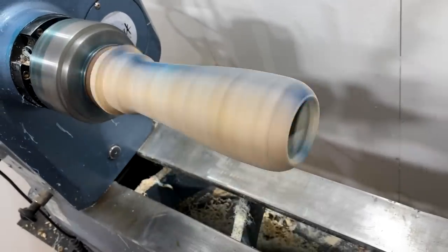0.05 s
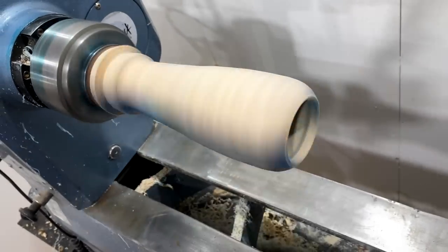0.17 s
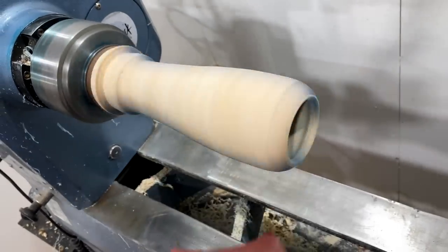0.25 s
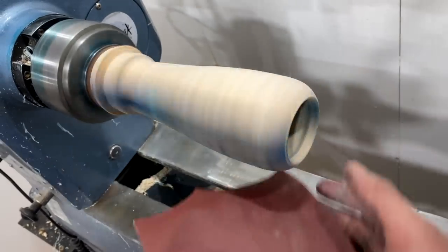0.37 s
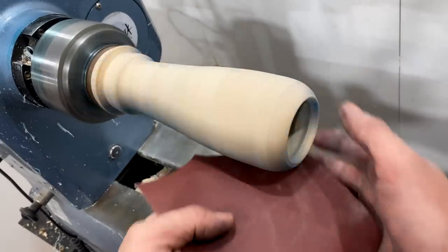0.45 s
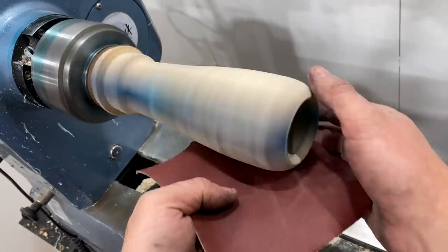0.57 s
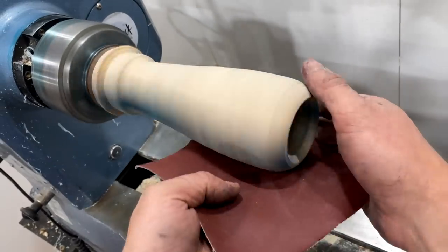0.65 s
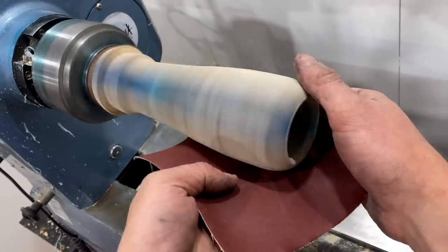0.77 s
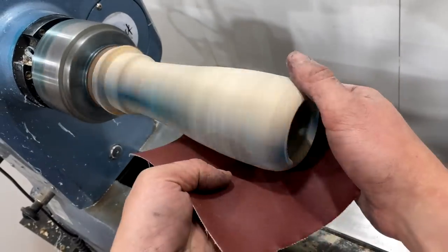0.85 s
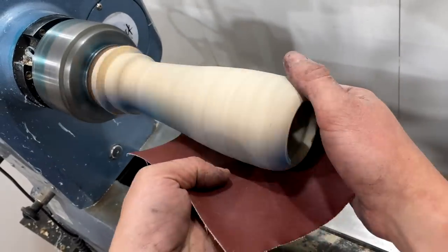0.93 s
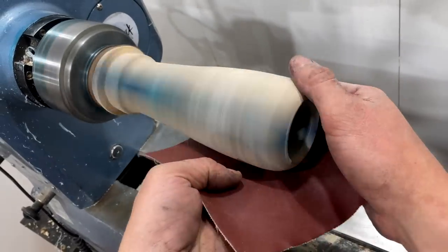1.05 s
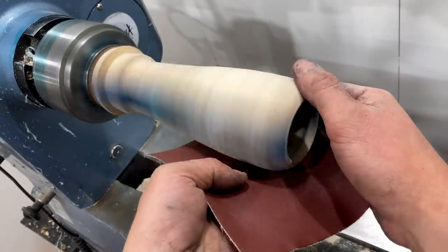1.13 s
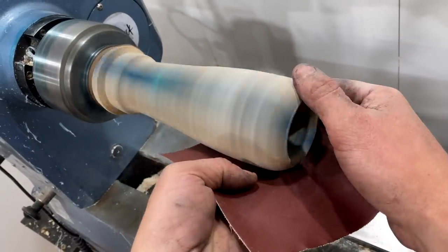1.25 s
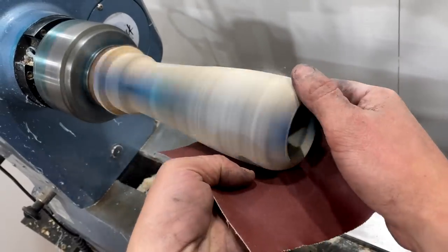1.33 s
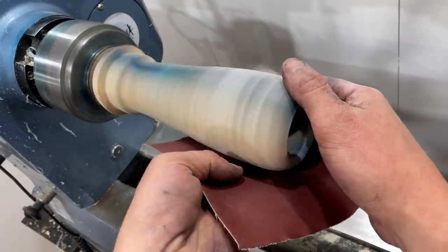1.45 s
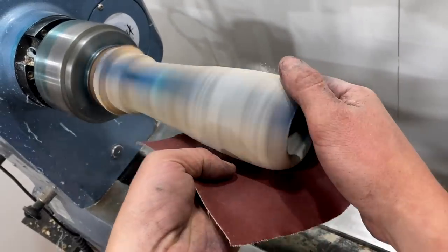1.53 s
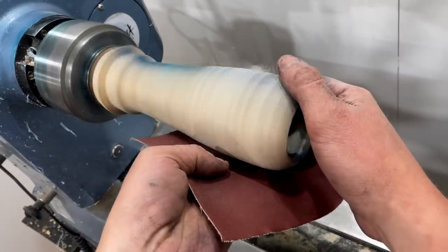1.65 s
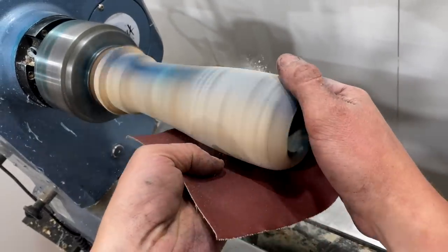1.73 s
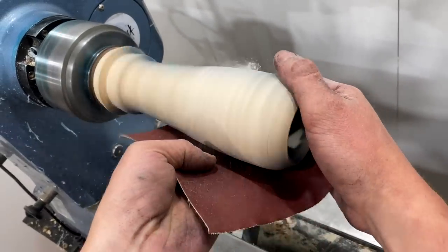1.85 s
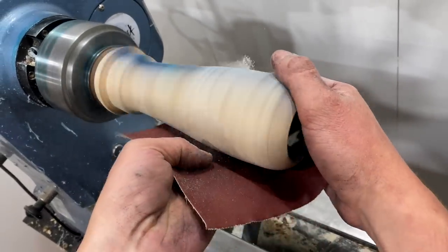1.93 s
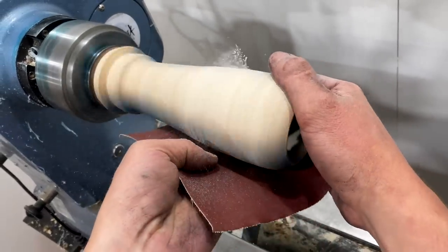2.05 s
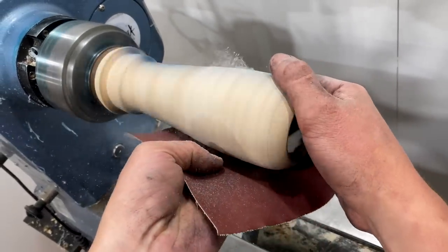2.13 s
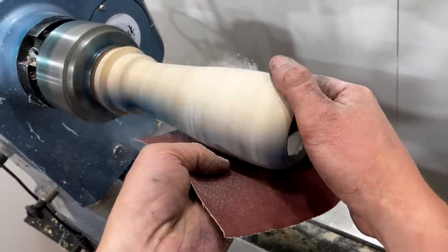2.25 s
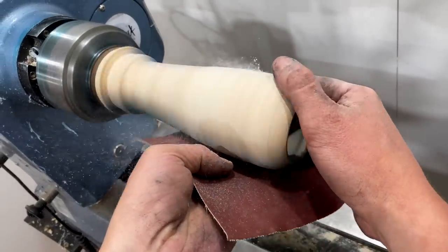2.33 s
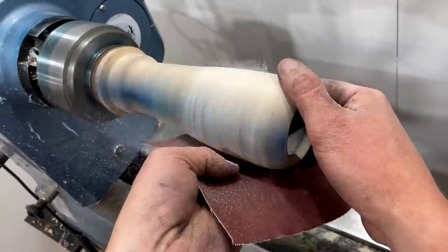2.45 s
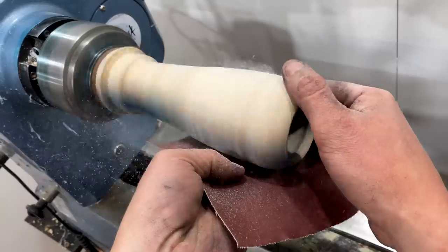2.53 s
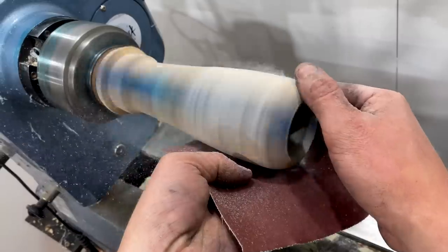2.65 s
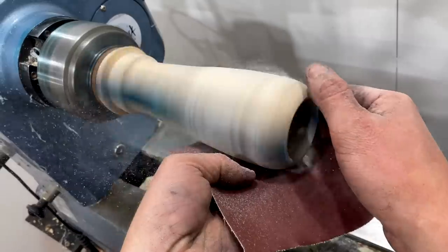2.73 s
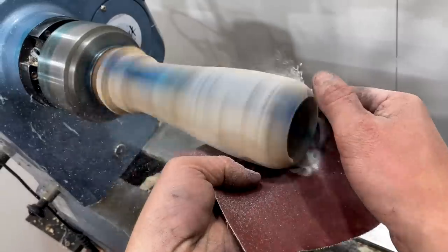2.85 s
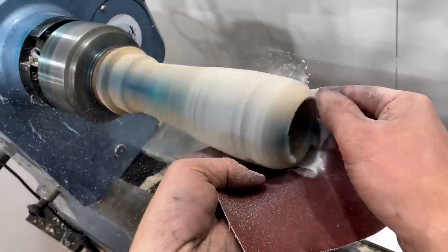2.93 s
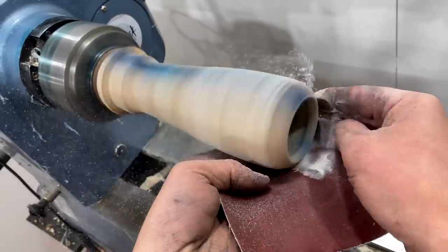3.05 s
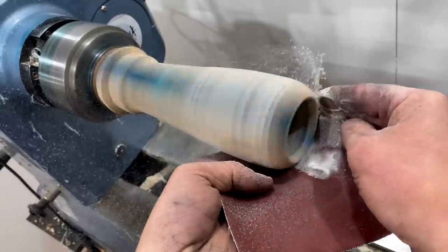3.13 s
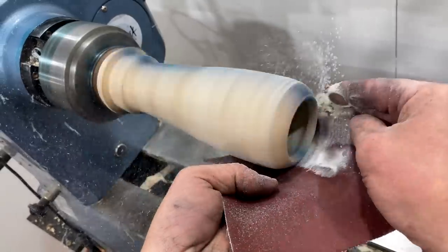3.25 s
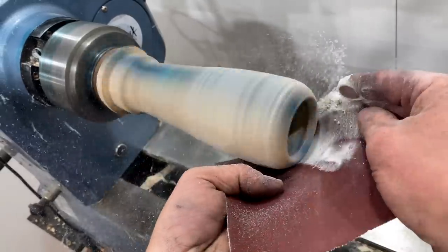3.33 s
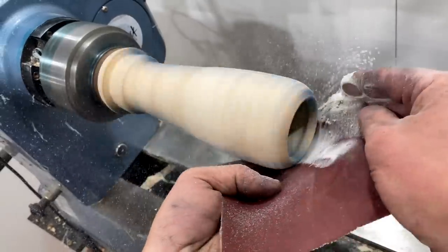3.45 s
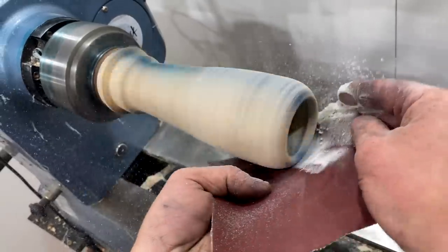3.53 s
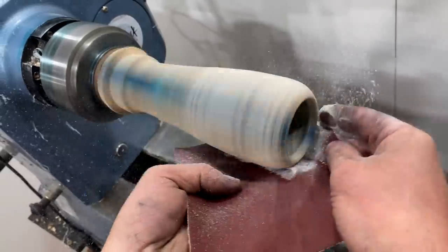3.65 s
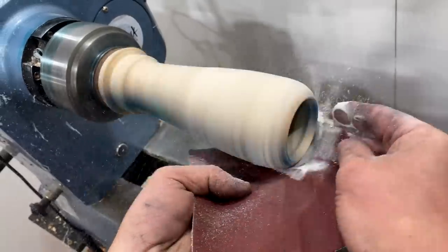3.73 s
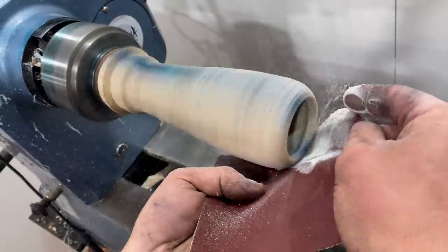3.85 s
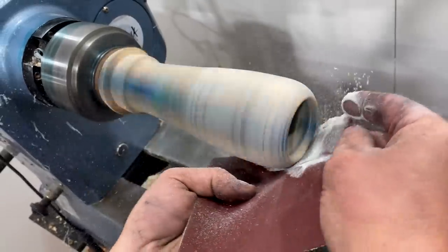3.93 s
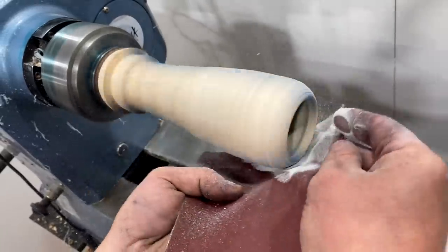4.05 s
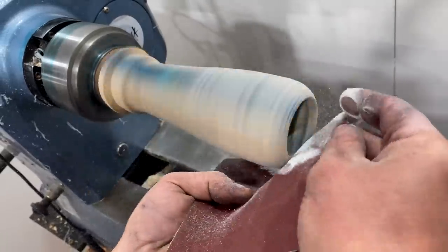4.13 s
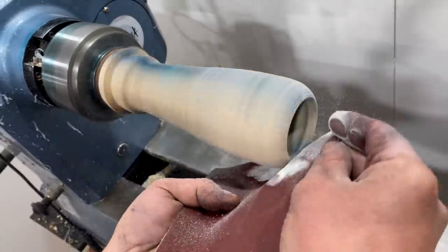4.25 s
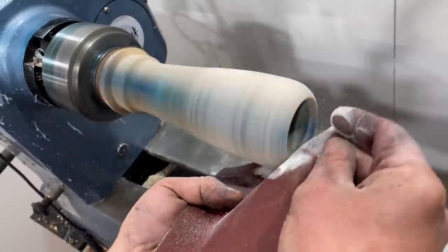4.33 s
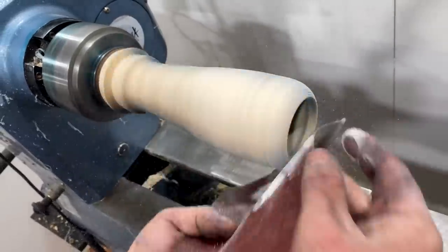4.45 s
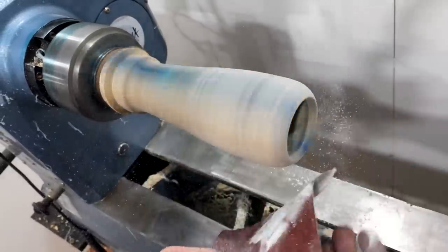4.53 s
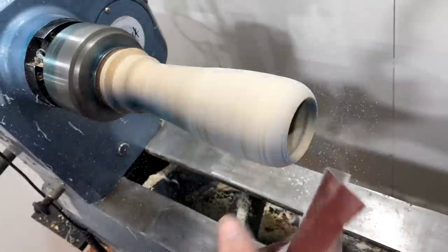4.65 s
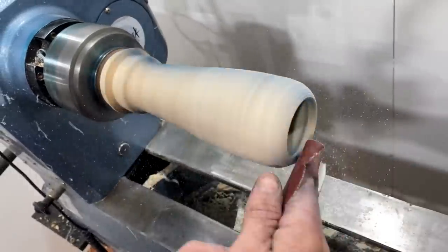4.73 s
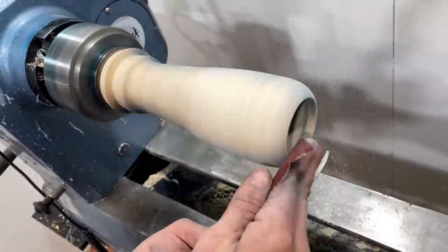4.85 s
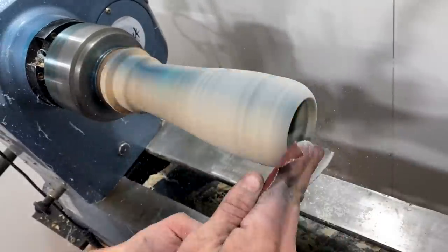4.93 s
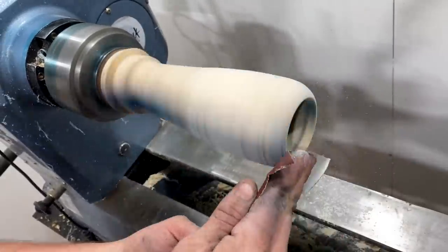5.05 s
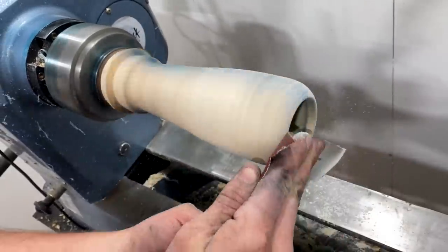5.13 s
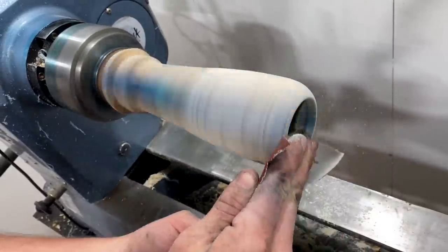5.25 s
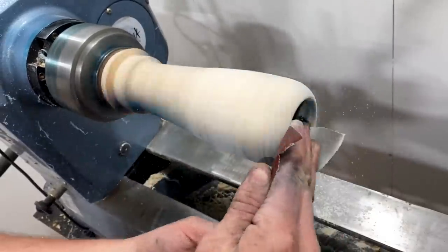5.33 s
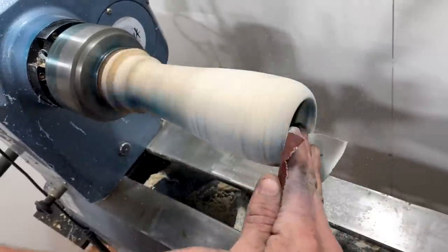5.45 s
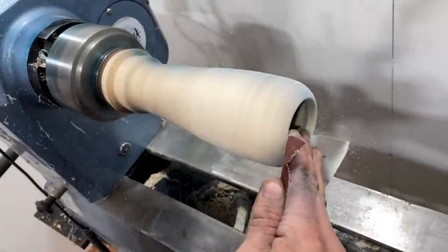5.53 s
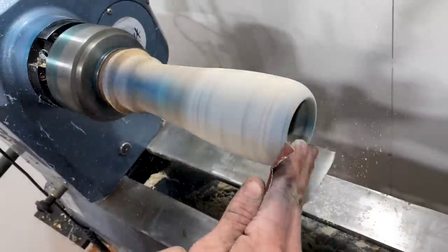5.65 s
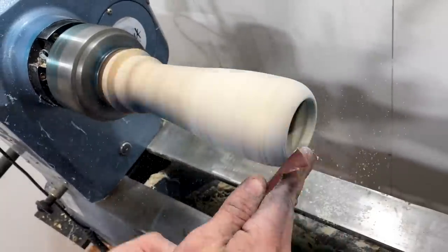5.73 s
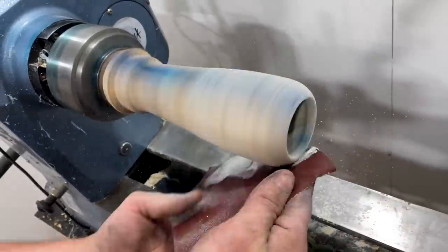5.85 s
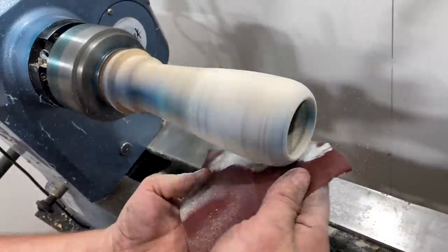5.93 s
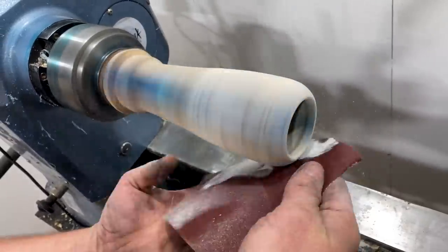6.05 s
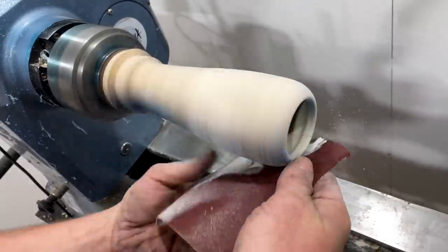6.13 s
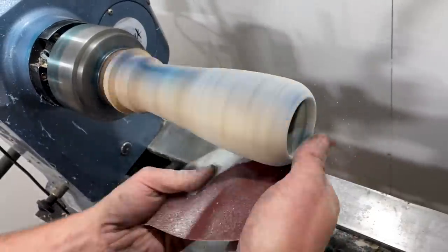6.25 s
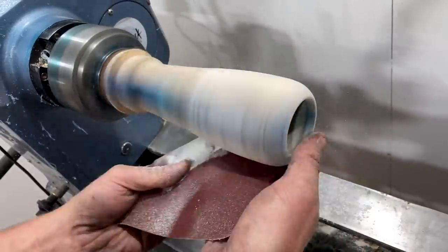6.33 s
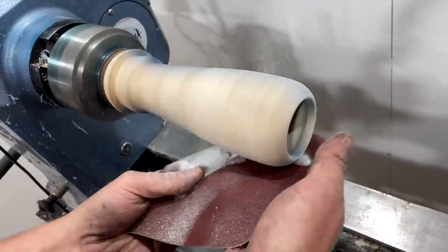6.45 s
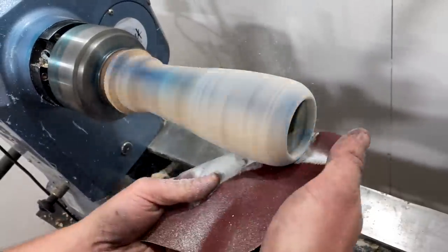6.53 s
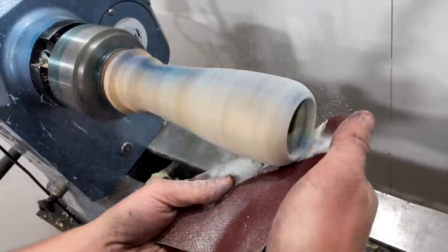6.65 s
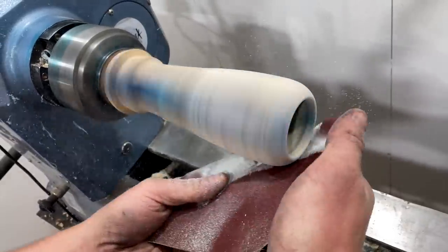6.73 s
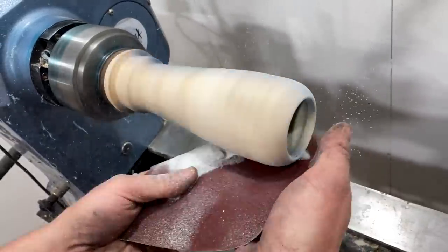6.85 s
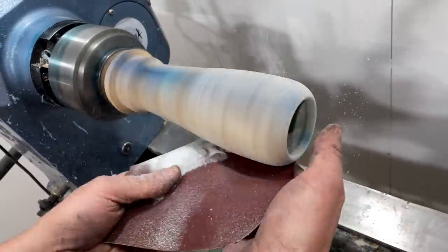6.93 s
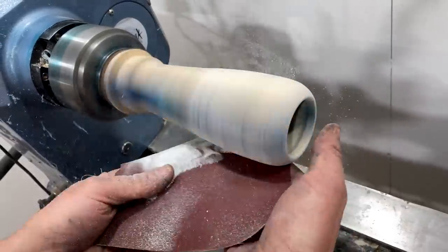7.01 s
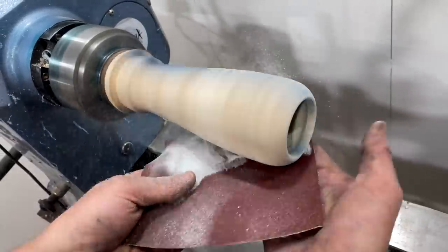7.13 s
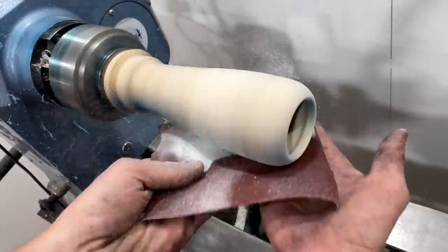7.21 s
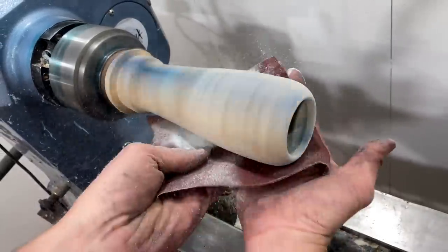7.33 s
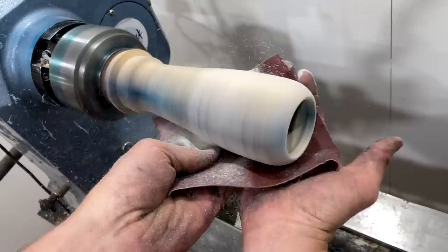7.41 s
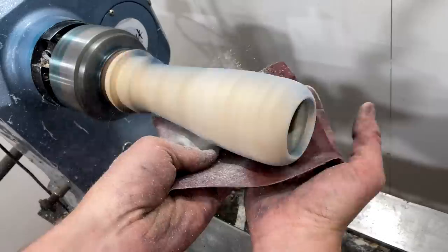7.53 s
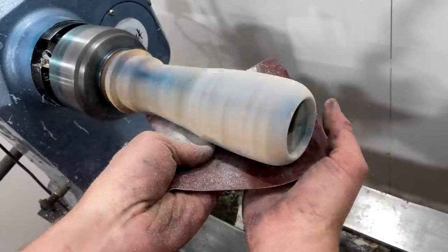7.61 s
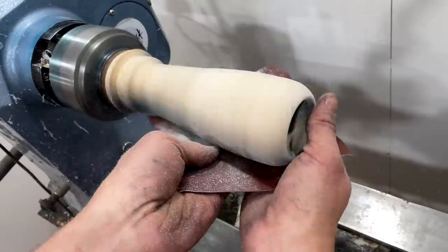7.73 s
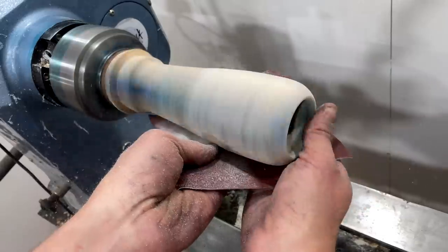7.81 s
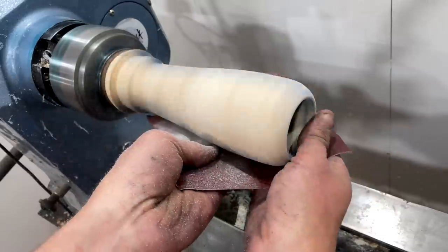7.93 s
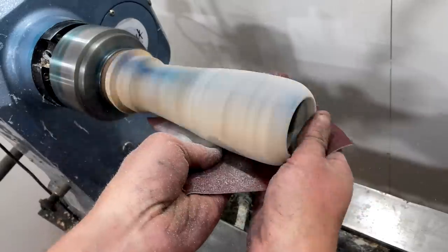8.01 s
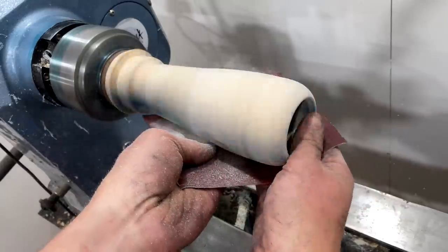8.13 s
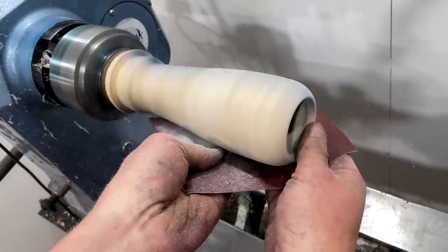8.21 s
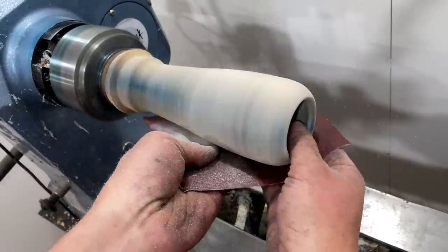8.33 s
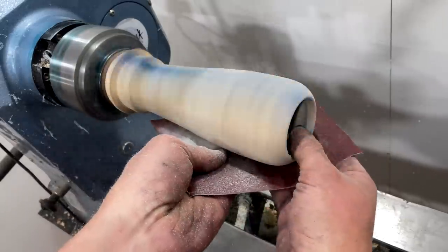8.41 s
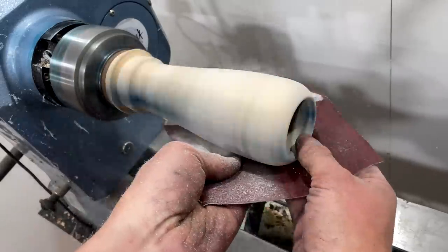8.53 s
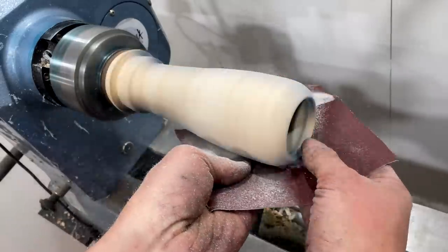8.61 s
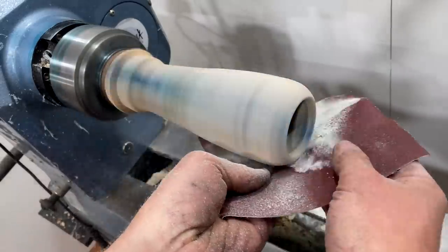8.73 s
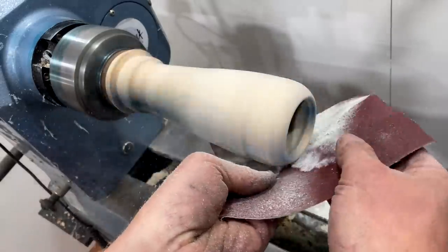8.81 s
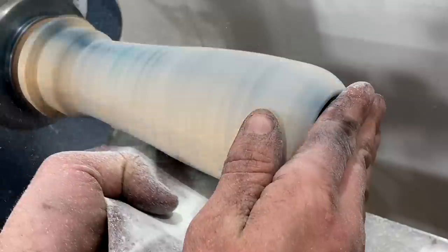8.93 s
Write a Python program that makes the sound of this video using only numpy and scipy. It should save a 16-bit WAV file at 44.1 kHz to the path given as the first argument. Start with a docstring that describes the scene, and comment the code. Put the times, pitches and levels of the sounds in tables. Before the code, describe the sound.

Heard from close up in a workshop, a lathe motor hums and whines as it spins a small hollow wooden vase. Almost at once sandpaper bumps onto the wood and hisses firmly. The grip loosens, and the sanding thins over a fluttering rumble. After a brief lift midway, the paper scrapes lightly at the rim, then rasps louder on the body to the end.

```python
"""A wood lathe spins a small hollow vase close to a two-port microphone: two hums beat, the drive whistles.
At 0.4 s sandpaper lands on the belly; the grit hisses, throbbing once a turn under a firm grip.
From 3 s the grip loosens: the hiss flutters, and the belt flaps as the load eases.
Near 4.5 s the paper lifts off for a moment, then works the rim lightly and excites its resonances.
From about 6 s the pressure rises and the sheet wraps the belly again."""
import sys
import numpy as np
from scipy import signal
from scipy.fft import rfft, irfft, next_fast_len
from scipy.io import wavfile
from scipy.ndimage import uniform_filter1d

SR = 44100
rng = np.random.default_rng(int(sys.argv[2]) if len(sys.argv) > 2 else 0)


def transcribe(u):
    """Save the signal u as a 16-bit wav file named by the first command-line argument.

    u: samples, shape (n,) or (channels, n), limited to [-1, 1]; the rate is SR.
    q: integer samples, one column per channel.
    """
    v = np.clip(np.atleast_2d(u).T, -1, 1)
    q = np.round(v * 32767).astype(np.int16)
    wavfile.write(sys.argv[1], SR, q)


N = 395577
TIME = np.arange(N) / SR
FFT_SIZE = next_fast_len(N, True)
FFT_HZ = np.fft.rfftfreq(FFT_SIZE, 1 / SR)
BASS_LEAD = -.4  # phase of the left port ahead of the right in the bass [rad]

def gain_of(db):
    """Amplitude ratio of a level in decibels."""
    return 10 ** (np.asarray(db) / 20)

def unit_rms(x):
    """Normalisation to rms 1."""
    return x / np.sqrt(np.mean(x ** 2) + 1e-20)

def over_frequency(rows):
    """Interpolation of a table on a logarithmic frequency axis."""
    hz, value = np.transpose(rows)
    return np.interp(np.log(FFT_HZ + 1), np.log(hz + 1), value)

def over_time(rows):
    """Linear interpolation in time, one curve per column."""
    times, *columns = np.transpose(rows)
    return [np.interp(TIME, times, column) for column in columns]

def swells(rows):
    """Gaussian envelopes, each given by its centre, duration at half height and height."""
    return sum(height * .5 ** ((2 * (TIME - s) / length) ** 2) for s, length, height in rows)

def level_swells(rows):
    """Gaussian amplitude envelopes with their peaks given in decibels."""
    return swells([(s, length, gain_of(db)) for s, length, db in rows])

def bursts(rows):
    """Damping: each sudden onset decays exponentially."""
    return sum(gain_of(db) * (TIME >= s) * np.exp(-abs(TIME - s) / decay_s) for s, db, decay_s in rows)

def wander(low_hz, high_hz, step=64):
    """Band-limited random modulation of rms 1."""
    t = TIME[::step]
    hz = np.fft.rfftfreq(len(t), step / SR) + 1e-6
    band = 1 / np.sqrt((1 + (low_hz / hz) ** 4) * (1 + (hz / high_hz) ** 4))
    drift = irfft(rfft(rng.standard_normal(len(t))) * band, len(t))
    return np.interp(TIME, t, unit_rms(drift))

# phase between the ports: (frequency [Hz], left lead [rad])
INTERPORT_PHASE = [(0, 0), (500, -.4), (800, 2.5), (1200, .6), (2000, .8), (3200, 1.8), (6200, -.1),
                   (7900, -2.8), (9300, -4), (10400, -6.2), (11400, -6.4), (12800, -9.3), (14200, -9.5),
                   (15000, -12.5)]
# likeness of the ports: (frequency [Hz], coherence [0-1])
INTERPORT_COHERENCE = [(50, 0.97), (280, 0.97), (400, .9), (550, 0.68), (1000, 0.68), (2000, 0.4),
                       (5000, 0.66), (7000, 0.62), (8300, .95), (9600, 0.65), (10800, 0.99), (12000, 0.72),
                       (13300, 1), (16000, 0.97)]
# balance of the ports: (frequency [Hz], left minus right [dB])
INTERPORT_LEVEL = [(100, 3), (300, -0.5), (600, -5), (1200, 2), (2000, 3.5), (3500, 8), (5000, 8.5),
                   (5600, 1), (6800, 5), (8200, -0.5), (16000, 0.5)]
def noise(spectrum, envelope=1):
    """Partial coherence: two ports share part of one coloured noise, scaled to rms 1."""
    left, unrelated = rfft(rng.standard_normal((2, N)) * envelope, FFT_SIZE)
    coherence = np.clip(over_frequency(INTERPORT_COHERENCE), 0, 1)
    right = coherence * left + np.sqrt(1 - coherence ** 2) * unrelated
    right *= np.exp(-1j * over_frequency(INTERPORT_PHASE))
    balance = gain_of(over_frequency(INTERPORT_LEVEL) / 2)
    ports = np.array([left * balance, right / balance]) * gain_of(over_frequency(spectrum))
    return unit_rms(irfft(ports, FFT_SIZE)[:, :N])

def ringing(modes):
    """Resonance: noise excites modes with Lorentzian peaks, scaled to rms 1."""
    bins = np.fft.rfftfreq(N, 1 / SR)
    response = sum(gain_of(db) / np.sqrt(width) / (1 + ((bins - hz) / (.57 * width)) ** 2)
                   for hz, width, db in modes)
    return noise(np.transpose([bins, 20 * np.log10(response)]))

def scratches(spectrum, per_s, spread_db, share):
    """Shot noise: tiny cuts merge to a hiss, with a share of the power in clumps of larger grains."""
    sizes = gain_of(spread_db * np.minimum(rng.exponential(1, N), 4))
    grains = sizes * (rng.random(N) < per_s / SR)
    clumps = uniform_filter1d(unit_rms(grains) ** 2, size=12)
    return noise(spectrum, np.sqrt(1 - share + share * clumps))

def tones(rows, waver_db, waver_hz, lead):
    """Random frequency and amplitude modulation of sines; the left port leads by `lead` radians."""
    out = np.zeros((2, N))
    for hz, db, wander_hz in rows:
        angle = 2 * np.pi * (np.cumsum(hz + wander_hz * wander(.293, waver_hz)) / SR + rng.random())
        amplitude = np.sqrt(2) * gain_of(db + waver_db * wander(.25, waver_hz))
        out += amplitude * np.sin([angle, angle - lead])
    return out

def orders(turns, rows):
    """Rotational orders: sines locked to multiples of a rate of rotation."""
    angles = [(db, 2 * np.pi * (order * turns + rng.random())) for order, db in rows]
    return np.sqrt(2) * sum(gain_of(db) * np.sin([angle, angle - BASS_LEAD]) for db, angle in angles)

# rush of air: (frequency [Hz], relative density [dB])
AIR_SPECTRUM = [(100, -10), (500, 1), (1300, 0), (2000, -2), (2700, -2.5), (3500, -5.5), (7000, -12),
                (11000, -17), (12500, -32), (16000, -42)]
def cooling_air():
    """Broadband flow noise: the cooling air rushes steadily."""
    return gain_of(-54.5) * noise(AIR_SPECTRUM)

# ring of the spindle: (time [s], level [dB])
SPINDLE_LEVEL = [(0.5, -57.5), (0.85, -68), (4.55, -66), (6.5, -71)]
def spindle_ring(hz=2315, wander_hz=22):
    """Narrowband vibration: the spindle rings thinly, most before the work begins."""
    level_db, = over_time(SPINDLE_LEVEL)
    return tones([(hz, level_db, wander_hz)], waver_db=1, waver_hz=70, lead=1)

# switching tones: (frequency [Hz], idle level [dB], loaded level [dB])
SWITCHING_TONES = [(9281, -61, -69), (9380, -70, -80), (9770, -68, -69), (9857, -59, -73), (9954, -52, -57),
                   (10142, -60, -56.5), (10240, -68, -74), (10520, -69, -78), (10719, -58, -51),
                   (10815, -66, -73), (10912, -68, -76)]
def drive_whistle(load_from_s=.38, load_to_s=.8):
    """Switching noise: a cluster of tones over a narrow sizzle changes balance as the drive is loaded."""
    load = np.interp(TIME, [load_from_s, load_to_s], [0, 1])
    cluster = [(hz, idle + (loaded - idle) * load, 3) for hz, idle, loaded in SWITCHING_TONES]
    return tones(cluster, waver_db=1.5, waver_hz=25, lead=.4) + gain_of(-60) * ringing([(10250, 800, 0)])

# tones of the belt: (order [per lap], level at full grip [dB])
BELT_HARMONICS = [(12, -62), (13, -60), (15, -54), (17, -53), (20, -53), (21, -52), (22, -55), (23, -58),
                  (24, -45.5), (25, -58), (26, -56), (27, -63), (50, -67)]
def belt(grip, lap_hz=11.42):
    """Periodic excitation: the belt's uneven run repeats each lap, giving clean tones under load."""
    laps = np.cumsum(lap_hz + .012 * wander(.19, 3.3)) / SR
    return grip ** 2 * orders(laps, BELT_HARMONICS)

# the two hums: (time [s], main level [dB], upper level [dB])
HUM_LEVELS = [(0.2, -55, -50), (1.0, -47.5, -57.5), (2.6, -50, -44.5), (3.6, -49, -50), (4.4, -45, -52),
              (6.0, -46, -52), (7.6, -43, -51), (8.96, -48, -58)]
# their spacing, wider as the load eases: (time [s], beat rate [Hz])
BEAT_RATE = [(0, 4.6), (1.56, 3.92), (3.95, 3.92), (4.0, 7.33), (6.1, 7.33), (6.3, 8.8), (6.9, 7.7)]
def motor_hum(hz=114.3):
    """Beating: two close hums interfere at their difference frequency."""
    main_db, upper_db = over_time(HUM_LEVELS)
    angle = 2 * np.pi * (np.cumsum(hz + .25 * wander(.34, 5)) / SR + rng.random())
    beat = 2 * np.pi * np.cumsum(over_time(BEAT_RATE)[0]) / SR
    ports = np.array([angle, angle - BASS_LEAD])
    hums = gain_of(main_db) * np.sin(ports) + gain_of(upper_db) * np.sin(ports + beat)
    return np.sqrt(2) * gain_of(.63 * wander(.33, 5)) * hums

# whining tones: (frequency [Hz], wander [Hz])
WHINE_TONES = [(839.3, 1.6), (865, 2.0), (886.5, 1.6)]
# their strengths: (time [s], lower level [dB], middle level [dB], upper level [dB])
WHINE_LEVELS = [(0.25, -49.5, -57, -55), (1.1, -66.5, -67.5, -72), (2.4, -59, -62, -63),
                (3.5, -64, -74, -77), (4.05, -76, -60, -71), (4.55, -65, -55.5, -68), (5.1, -58, -61, -67),
                (6.1, -51.5, -66, -62), (7.1, -55.5, -63, -57), (7.6, -62.5, -66, -68),
                (8.96, -61, -62, -65)]
# motor housing: (frequency [Hz], bandwidth [Hz], relative level [dB])
HOUSING_RESONANCES = [(418, 230, 3), (570, 24, -0.5), (772, 30, -7.5), (1030, 200, -9), (1320, 170, -4),
                      (1545, 130, -7.5), (1980, 500, -7.5), (2290, 130, 1.5)]
def motor_whine():
    """Structural resonance: the housing rings in step with the lowest of three thin whining tones."""
    levels = over_time(WHINE_LEVELS)
    rows = [(hz, db, wander_hz) for (hz, wander_hz), db in zip(WHINE_TONES, levels)]
    whine = tones(rows, waver_db=2.2, waver_hz=9, lead=2.05)
    return whine + gain_of(levels[0] - 1.5) * ringing(HOUSING_RESONANCES)

# running machine: (time [s], base rumble level [dB], base drone level [dB])
MACHINE_LEVELS = [(0, -44, -39), (0.42, -42.5, -33), (0.8, -38.5, -44), (1.4, -41.5, -42), (2.75, -43, -55),
                  (3.7, -45, -51), (4.8, -43, -45), (6.3, -41, -43.5), (7.2, -39.5, -36),
                  (8.96, -42.5, -51.5)]
# drone: (frequency [Hz], relative level [dB], wander [Hz])
DRONE_TONE = [(216.8, -1, .8)]
# its surges: (time [s], duration [s], gain [dB])
DRONE_SURGES = [(0.66, 0.11, -5), (3.37, 0.14, 11.5), (4.33, 0.11, 7.5), (4.8, 0.22, 8), (5.22, 0.2, 7),
                (5.65, 0.25, 5)]
# rumble of the frame: (frequency [Hz], relative density [dB])
FRAME_SPECTRUM = [(20, -37), (45, -9), (70, -23), (95, -15), (115, -3), (140, -9.5), (180, -1.5), (215, 1),
                  (285, 3), (320, -13.5), (400, -25), (490, -15.5), (580, -28), (700, -70), (1500, -39.5)]
def lathe(grip, flap_hz=22.1, flap_depth_db=3.7):
    """Amplitude modulation: amid the machine's sounds, the slack belt's flap shakes rumble and drone."""
    rumble_db, drone_db = over_time(MACHINE_LEVELS)
    flap = 2 * np.pi * flap_hz * (TIME - .008) + .3 * wander(.5, 4)
    flap_db = flap_depth_db * (1 - grip) * (np.cos(flap) + .45 * np.cos(2 * flap))
    drone = tones(DRONE_TONE, waver_db=1, waver_hz=9, lead=BASS_LEAD)
    drone *= gain_of(drone_db + swells(DRONE_SURGES) + .25 * flap_db)
    ring = spindle_ring()
    damping_db = 10 * grip ** 2  # a firm hand steadies the frame
    frame = gain_of(rumble_db + flap_db - damping_db) * noise(FRAME_SPECTRUM)
    motor = motor_hum() + motor_whine()
    return drone + ring + frame + motor + belt(grip) + drive_whistle() + cooling_air()

# hand and paper striking the wood: (time [s], level [dB], decay time [s])
KNOCK_EVENTS = [(0.383, -42, .012), (0.472, -31.5, .01), (0.505, -43, .01), (0.528, -42, .012),
                (0.558, -38, .01), (0.655, -42, .025), (4.085, -46, .04), (4.757, -44, .035),
                (5.384, -45, .025), (6.285, -43, .029), (7.05, -41, .015), (7.11, -42, .025)]
# a knock: (frequency [Hz], relative density [dB])
KNOCK_SPECTRUM = [(60, 3), (160, 17), (300, 4), (480, 5), (750, 2), (1200, -4), (2000, -22), (3000, -41)]
def knocks():
    """Impact excitation: hand and paper land on the wood with dull knocks."""
    return bursts(KNOCK_EVENTS) * noise(KNOCK_SPECTRUM)

# scrapes at the rim: (time [s], duration [s], level [dB])
RIM_CATCHES = [(4.765, .025, -46.5), (5.12, .03, -51), (5.315, .03, -46.5), (5.37, .025, -49),
               (5.466, .016, -44.5), (5.755, .04, -52), (5.907, .022, -45), (6.43, .03, -47),
               (7.35, .03, -44), (8.41, .025, -48), (8.92, .03, -49)]
# a scrape: (frequency [Hz], relative density [dB])
CATCH_SPECTRUM = [(300, -20), (600, -10), (1000, -4), (1400, 1.5), (2200, -7), (4000, -4), (8000, -20)]
def rim_catches():
    """Transient friction: the sheet's edge catches on the rim."""
    return level_swells(RIM_CATCHES) * scratches(CATCH_SPECTRUM, per_s=700, spread_db=4, share=.3)

# judders: (time [s], duration [s], frequency [Hz], level [dB])
JUDDERS = [(0.88, .14, 410, -51), (1.13, .25, 400, -52), (1.932, 0.09, 408, -48), (2.3, .25, 414, -55),
           (5.4, 0.2, 430, -52), (7.25, .3, 365, -53)]
def paper_moans():
    """Friction-excited vibration: the paper judders with a low moan."""
    return sum(level_swells([(s, length, db)])
               * tones([(hz, 0, 11)], waver_db=3, waver_hz=28, lead=BASS_LEAD)
               for s, length, hz, db in JUDDERS)

# low tones at whole and half multiples of the spin rate: (order [per turn], base level [dB])
SPIN_TONES = [(1, -64), (2.5, -56), (3.5, -62), (4, -64), (5, -55), (5.5, -54), (6, -57), (6.5, -52),
              (7, -57), (7.5, -59), (8, -62), (9, -56), (9.5, -60), (10, -61), (10.5, -60), (13.5, -70)]
# thuds under a loose grip: (frequency [Hz], relative density [dB])
THUD_SPECTRUM = [(20, -26), (45, -22), (66, -8), (79, -2), (92, -7.5), (130, -10.5), (400, -22),
                 (1000, -75)]
# changes in the sheet's bouncing: (time [s], duration [s], gain [dB])
SHEET_BOUNCES = [(0.7, .18, 4), (3.7, 0.52, 11.5), (5.1, 1.0, -9), (5.9, 0.088, 12), (6.32, 0.37, 6.5),
                 (6.88, 0.13, 9), (7.3, .2, 0), (8.8, 0.79, 5)]
def workpiece(turns, grip, contact, pressure_db, free_spin_db=-57.5):
    """Forced vibration: the spinning wood shakes; a firm grip brings low tones, a loose one thuds."""
    low_tones = 1.25 * grip ** 2 * orders(turns, SPIN_TONES)
    slack = (1 - grip) ** 2
    # an oval piece pushes the paper twice a turn
    oval = np.sqrt(2) * np.sin(2 * np.pi * 2 * turns + slack * 1.5 * wander(.7, 6))
    thuds = slack * gain_of(7) * noise(THUD_SPECTRUM)
    pressed = gain_of(-44 + .98 * pressure_db + swells(SHEET_BOUNCES))
    strength = contact * pressed + (1 - contact) * gain_of(free_spin_db)
    shaking = strength * (gain_of(-2.5) * oval + thuds)
    return shaking + paper_moans() + low_tones * gain_of(.52 * wander(.8, 16))

# the vase's belly and rim: (frequency [Hz], bandwidth [Hz], relative level [dB])
BELLY_RESONANCES = [(1230, 160, 0)]
RIM_RESONANCES = [(464, 70, -23), (556, 40, -4), (1904, 53, -1.5), (2330, 230, -7), (2720, 150, -2),
                  (4000, 550, 4), (5140, 700, 4.5)]
def vase_ring(grip):
    """Modal excitation: a firm grip sounds the belly, a loose one the rim."""
    belly = gain_of(-10.5) * grip * ringing(BELLY_RESONANCES)
    return belly + gain_of(2.5) * (1 - grip) * ringing(RIM_RESONANCES)

# curl of the sheet round the wood: (time [s], share [0-1])
SHEET_WRAP = [(3.0, 0.16), (6.1, 0.63), (7.15, 0.44), (7.38, 0.8), (7.65, 0.49), (8.97, 0.7)]
# curled sheet: (frequency [Hz], bandwidth [Hz], relative level [dB])
CURL_RESONANCES = [(2600, 710, -10.5), (3360, 630, -6)]
def curl_ring():
    """Resonance: the sheet rings more strongly the further it is curled."""
    return gain_of(-2.5) * over_time(SHEET_WRAP)[0] * ringing(CURL_RESONANCES)

# bends of the sheet: (time [s], duration [s], frequency [Hz], bandwidth [Hz], gain [dB])
SHEET_BENDS = [(1.0, 0.4, 4100, 1600, 2.5), (1.48, 0.26, 1230, 200, 8), (2.27, .25, 1190, 250, 3.5),
               (3.653, 0.22, 4430, 1100, 6), (5.68, 0.22, 2480, 450, 5.5), (5.7, 0.33, 3350, 600, -7),
               (6.07, 0.17, 3450, 800, 2), (7.424, 0.2, 3370, 500, 2.5), (7.42, 0.27, 2440, 350, 5.5)]
def flexed(rasp):
    """Time-varying filtering: as the sheet bends, single bands of the rasp swell or hollow out."""
    spectrum = rfft(rasp, FFT_SIZE)
    for s, length, hz, width, db in SHEET_BENDS:
        band = irfft(spectrum * .5 ** ((2 * (FFT_HZ - hz) / width) ** 2), FFT_SIZE)[:, :N]
        rasp = rasp + (gain_of(swells([(s, length, db)])) - 1) * band
    return rasp

def hand_reflection(direct, strength=.21, delay_s=.000589):
    """Comb filtering: a close reflection off the moving hands and sheet keeps shifting the colour."""
    delayed_time = TIME - delay_s * np.exp(.286 * wander(.72, 4.4))
    echo = np.array([np.interp(delayed_time, TIME, port) for port in direct])
    return (direct + strength * echo) / np.hypot(1, strength)

# cutting grit, scraping sheet and hollow wall: (frequency [Hz], relative density [dB])
GRIT_SPECTRUM = [(1000, -31.5), (4000, -32), (6000, -30.5), (7200, -1.5), (8200, -4.5), (9300, 4),
                 (10500, -0.5), (12200, 2), (13000, -3), (14000, -6), (16000, -9.5)]
SHEET_SPECTRUM = [(500, -51), (1500, -31), (2400, -10), (3000, -2.5), (3500, 1), (5000, 1), (6500, 5),
                  (8000, -10), (12000, -30), (16000, -33)]
WALL_SPECTRUM = [(150, -22), (400, 14), (550, -18), (720, 1.5), (1000, 2.5), (1230, 0.5), (1500, 3),
                 (1900, 8), (2500, 4), (3500, 2.5), (8000, -46)]
# brief swells and dips in the sanding hiss:
# (time [s], duration [s], grit gain [dB], sheet gain [dB], wall gain [dB])
HISS_SWELLS = [(0.402, 0.015, -6, -4, -1), (0.418, .012, 3.5, 3, 0), (0.43, .006, -5, -3, 0),
               (0.442, 0.015, 6, 3, -1), (0.563, .018, 3, 2, 2), (0.586, .025, -1.5, -2, -1),
               (0.52, 0.065, 1, 3, 2), (1.28, 0.16, 1.5, -2, 0.5), (1.455, 0.14, -2.5, -1.5, 1.5),
               (1.642, 0.11, -2, -0.5, 3), (1.877, 0.23, 3, 4.5, 1.5), (2.964, 0.17, 3.5, -0.5, 2),
               (3.105, .1, -0.5, 0.5, -1.5), (3.224, 0.14, 3, -2.5, 3), (3.41, 0.084, 2, -1, 2),
               (3.66, 0.33, 6, 2, 6.5), (3.896, .1, -1.5, -4.5, -1), (4.08, 0.13, 0, -0.5, 4),
               (4.28, 0.28, -1.5, -0.5, 3.5), (4.73, .04, 1.5, -3.5, -4), (4.773, 0.042, -2, 1, 2.5),
               (4.834, 0.058, 4.5, 4, 2.5), (5, 0.061, 5.5, 5.5, 0), (5.17, 0.081, 4.5, 3.5, 0),
               (5.308, 0.064, 5.5, 7, 4.5), (5.42, 0.22, 3, 0, 1), (5.582, 0.16, 4, 5, -1),
               (5.92, 0.11, 7, 3, 0), (6.004, 0.09, 3, -2, -1.5), (6.096, 0.055, 1.5, -8, -1),
               (6.163, 0.063, 3, 4, 1), (6.306, 0.087, 1, 5.5, 1), (6.42, 0.052, 4, 4.5, 2),
               (6.63, 0.14, -2, -3, -5), (7.133, 0.1, -5, -10, -11), (7.2, .035, 5, 7.5, 3),
               (7.293, 0.027, 4.5, 5, 4), (7.36, 0.12, 5, 6.5, 0.5), (7.483, 0.092, 0, 2.5, 0),
               (7.573, 0.086, 3.5, 4, 2.5), (7.97, .04, 3, 1.5, 4), (8.098, 0.038, 4.5, 2.5, 3),
               (8.2, 0.032, -1, -1, -2), (8.285, 0.092, 2, 1, 1.5), (8.81, 0.11, -3.5, -6, 1)]
def sandpaper(turns, grip, contact, pressure_db, wall_db):
    """Friction noise: grit cuts, the sheet radiates and the wall rasps, all under one contact force."""
    throb = 1.95 * np.cos(2 * np.pi * turns) + .92 * np.sin(2 * np.pi * 2 * turns)
    flutter = 1.25 * wander(8.3, 28)
    force_db = grip * throb + (1 - .75 * grip) * flutter + .29 * wander(.7, 4.1)
    grit_swell_db, sheet_swell_db, wall_swell_db = (
        swells([(s, length, gains[part]) for s, length, *gains in HISS_SWELLS]) for part in range(3))
    landing_s = CONTACT_SPANS[0][0]
    bite_db = swells([(landing_s + .085, .15, 4)])  # the grit cuts harder just after it first lands
    curl, vase = curl_ring(), vase_ring(grip)
    grit = scratches(GRIT_SPECTRUM, per_s=2200, spread_db=-1, share=.21)
    sheet = scratches(SHEET_SPECTRUM, per_s=1800, spread_db=1.2, share=.14) + curl
    wall = scratches(WALL_SPECTRUM, per_s=690, spread_db=3.5, share=.28) + vase
    grit *= gain_of(-21.5 + pressure_db + grit_swell_db + bite_db + force_db)
    sheet *= gain_of(-33.5 + .86 * (pressure_db + sheet_swell_db) + .73 * force_db)
    wall *= gain_of(2 + wall_db + wall_swell_db + .33 * force_db)
    return hand_reflection(flexed(contact * (grit + sheet + wall)))

# coarse grains catching: (time [s], level [dB])
GRAIN_SNAGS = [(0.423, -18), (0.439, -18), (0.828, -24), (4.717, -33)]
def grain_ticks(decay_s=.0015):
    """Impulsive release: coarse grains snap free with a tick."""
    envelope = bursts([(s, db, decay_s) for s, db in GRAIN_SNAGS])
    return envelope * (noise(GRIT_SPECTRUM) + gain_of(-9) * noise(SHEET_SPECTRUM))

# folds of the sheet: (time [s], duration [s], level [dB])
SHEET_FOLDS = [(4.623, .03, -55), (4.672, 0.041, -56)]
def fold_rustle():
    """Crackling noise: the lifted sheet rustles as it is folded."""
    return level_swells(SHEET_FOLDS) * scratches(SHEET_SPECTRUM, per_s=500, spread_db=3, share=.5)

# paper on the wood: (start [s], end [s])
CONTACT_SPANS = [(0.384, 4.447), (4.719, 9.0)]
# hold on the sheet: (time [s], firmness [0-1])
HAND_GRIP = [(0.38, 0.48), (0.8, 0.82), (2.8, 0.81), (3.3, 0.71), (3.9, 0.27), (4.5, 0.25), (5.8, 0.17),
             (6.4, 0.11), (8.97, 0.46)]
# bearing on belly, rim, then belly: (time [s], relative pressure [dB], base wall level [dB])
HAND_PRESSURE = [(0.38, -2.5, -45.5), (0.8, -1.5, -47.5), (1.45, -1, -48.5), (1.7, -4.5, -53),
                 (2.25, -4, -46), (3.17, -5.5, -54), (3.45, -14, -59.5), (3.8, -15.5, -59), (4.0, -17, -58),
                 (4.45, -21, -59), (4.8, -16.5, -51), (5.78, -21, -55), (6.25, -10, -51), (7.0, -7, -49),
                 (7.3, -6, -49), (7.8, -5, -50.5), (8.25, -5, -49), (8.96, -8, -56)]
def scene(spindle_hz=39.45, land_s=.0069, lift_s=.025):
    """Superposition: over the machine, rotation and hand pressure drive both the shaking and the hiss."""
    turns = np.cumsum(spindle_hz + .055 * wander(.33, 4.7)) / SR
    contact = sum(np.interp(TIME, [start - land_s, start, end, end + lift_s], [0, 1, 1, 0])
                  for start, end in CONTACT_SPANS)
    grip = over_time(HAND_GRIP)[0] * contact
    pressure_db, wall_db = over_time(HAND_PRESSURE)
    wood = workpiece(turns, grip, contact, pressure_db)
    machine = lathe(grip)
    sanding = sandpaper(turns, grip, contact, pressure_db, wall_db)
    return machine + wood + sanding + grain_ticks() + knocks() + rim_catches() + fold_rustle()

def record(dry, cutoff_hz=15850):
    """Band limiting: a linear-phase low-pass filter removes the highest treble."""
    lowpass = signal.firwin(511, cutoff_hz, window=("kaiser", 9), fs=SR)
    return signal.oaconvolve(dry, lowpass[None], "same")

dry = scene()
out = record(dry)
transcribe(out)
```